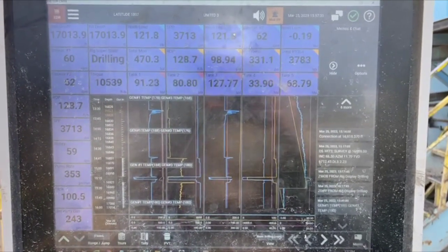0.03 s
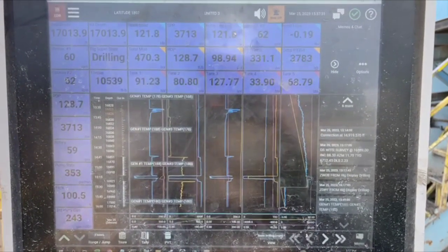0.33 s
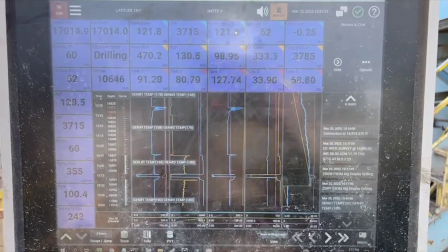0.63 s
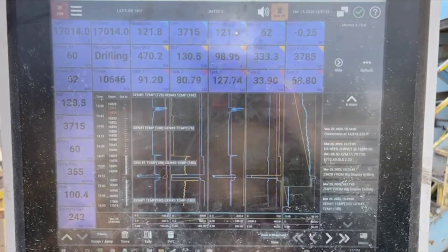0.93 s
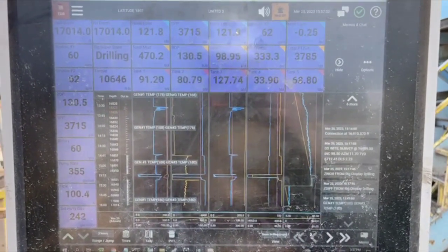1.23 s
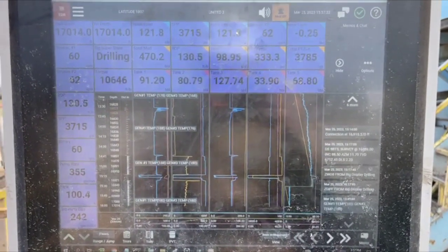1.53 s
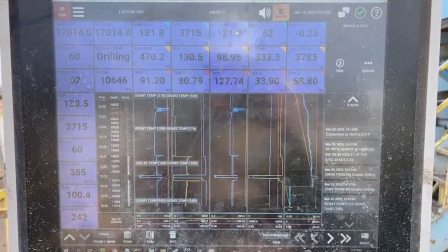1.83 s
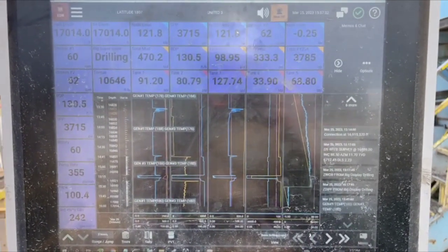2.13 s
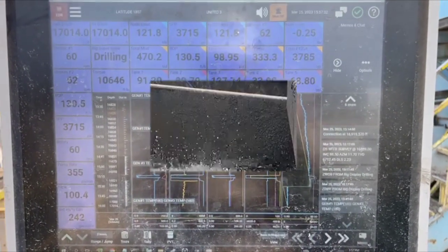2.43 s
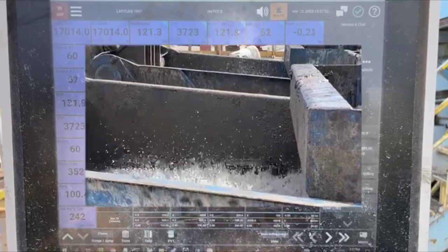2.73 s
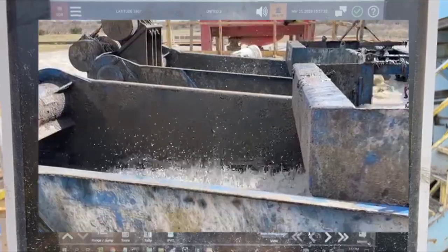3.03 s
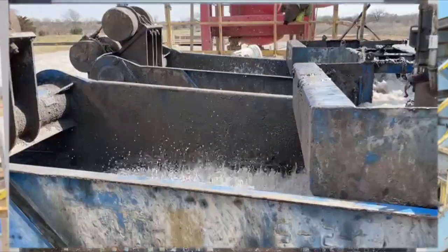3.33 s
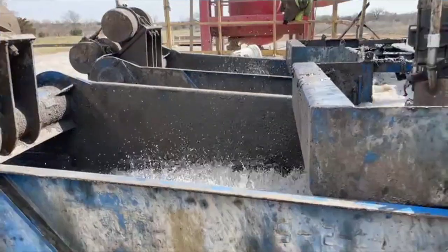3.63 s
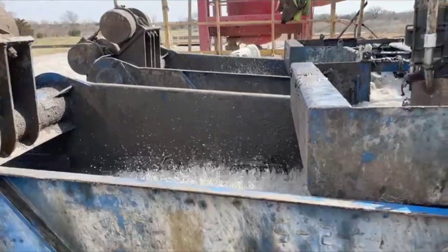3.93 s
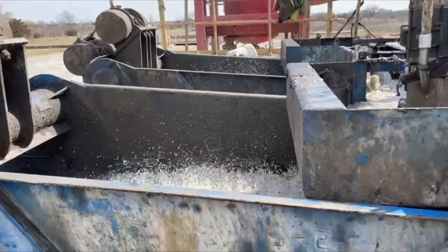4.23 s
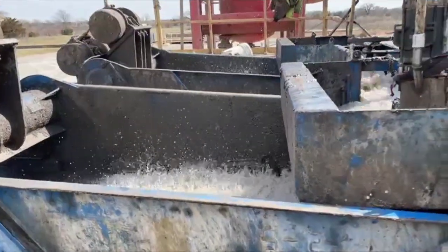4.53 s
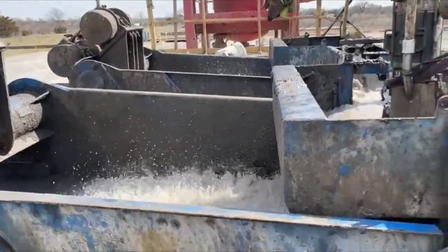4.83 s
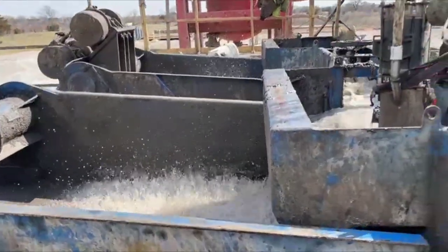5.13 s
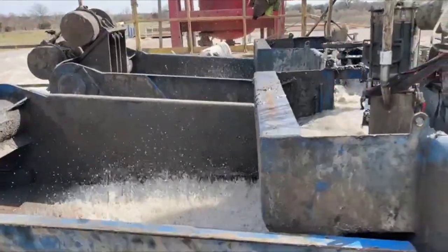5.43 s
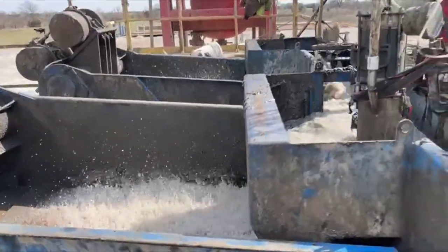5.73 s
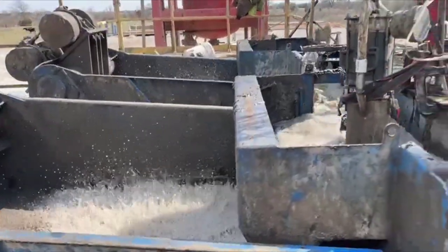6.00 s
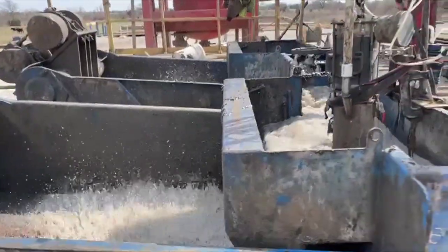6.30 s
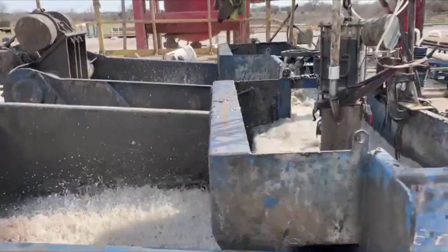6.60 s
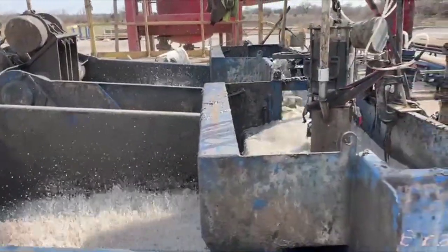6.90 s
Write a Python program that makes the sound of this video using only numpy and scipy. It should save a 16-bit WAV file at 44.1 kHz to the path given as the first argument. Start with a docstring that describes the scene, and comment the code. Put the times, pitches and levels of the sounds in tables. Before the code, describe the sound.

Outdoors on a drilling rig, a loud diesel engine drones over a pulsing low roar and gusts of faintly whistling air, with a few dull clunks. After about two seconds, close vibrating mud shakers cut in, chugging and rattling as mud hisses and spatters on their sieves. The engine and air overlap briefly, then stop. The shakers' throb grows, with a few quick slaps and a swelling steel ring.

```python
"""On a drilling rig, first at a control screen, then beside the shakers that sieve the drilling mud.
At the screen a diesel engine drones at about 1800 turns a minute over the roar of the plant and a rush
of air. The shakers turn a little slower: their baskets chug and knock, a steel wall sings, and mud
splashes and pops on the sieves. The two places overlap for a moment."""
import sys
import numpy as np
from scipy import signal
from scipy.fft import rfft, irfft
from scipy.io import wavfile

SR = 44100
rng = np.random.default_rng(int(sys.argv[2]) if len(sys.argv) > 2 else 0)


def wav_record(signal):
    """Record a signal, one row per channel, as 16-bit PCM in the file named by sys.argv[1]."""
    frames = np.transpose(np.atleast_2d(signal))
    bounded = np.clip(frames, -1, 1)
    # unit amplitude maps onto the largest positive 16-bit level
    quanta = np.round(bounded * 32767).astype(np.int16)
    wavfile.write(sys.argv[1], SR, quanta)


N = 315756
TIME = np.arange(N) / SR
SHAKERS_IN_S, SCREEN_OUT_S = 2.268, 3.712
DIESEL_TURNS_PER_S, SHAKER_TURNS_PER_S = 30.18, 30.06

# In each turn a basket lands, bounces and is jerked up. Each row: moment as a share of the turn, push.
KNOCKS = [(.09, .6), (.24, .6), (.7, -.38)]


def diesel(turns):
    """The engine's repeating blows make a stack of tones; two of them swell and fade."""
    # The engine's tones. Each row: multiple of the shaft speed, relative level in dB.
    tones = [(0.5, -50), (1, -20), (1.5, -27), (2, -15.5), (2.5, -35), (3, -20), (3.5, -28.5), (4, -9),
             (4.5, -25), (5, -18), (5.5, -10), (6, -16), (6.5, -8), (7, -15.5), (7.5, -27), (8, -13),
             (8.5, -19), (9, -25), (9.5, -11.5), (10, -19.5), (10.5, -33.5), (11, -17), (11.5, -24.5),
             (12, -13), (12.5, -29), (13, -18.5), (13.5, -17.5), (14, -16.5), (14.5, -18.5), (15, -41),
             (15.5, -20), (16, -35), (16.5, -20.5), (17, -14.5), (17.5, -15.5), (18, -27), (18.5, -22),
             (19, -18), (19.5, -22), (20, -23), (20.5, -26), (21, -19), (21.5, -32), (22, -21)]
    # The lower and the upper swelling tone. Each row: time in seconds, boost in dB.
    lower = [(0, 0), (.7, -2.5), (1.35, 5.5), (1.8, -2.5), (3.7, 0.5)]
    upper = [(0, 2.5), (.9, 1), (1.5, -1), (3.7, 1)]
    swells = {5.5: curve(lower), 6.5: curve(upper)}
    return undb(-19) * drone(turns, tones, [(0.0015, 1)], smear_hz=151.9, waver=0.31, swells=swells)


def baskets(turns, throb_db):
    """The knocking shaker baskets hum, and one steel wall swells into song."""
    # The baskets' tones. Each row: multiple of the shaft speed, relative level in dB.
    tones = [(1, -16), (2, 1.5), (3, 1), (4, -14), (5, -11.5), (6, -10.5), (7, -21.5), (8, -20), (9, -14),
             (10, -20.5), (11, -25.5), (12, -23), (13, -15.5), (14, -14.5), (15, -19), (16, -23), (17, -15),
             (18, -37), (19, -21.5), (20, -13.5), (21, -21.5), (22, -22.5), (23, -33), (24, -23),
             (25, -25.5)]
    # The wall's song. Each row: start in seconds, length in seconds, peak boost in dB.
    wall_swells = [(3.45, 0.34, 1), (4.3, 0.4, 3), (4.6, 0.3, 4.5), (5.66, 0.42, 6.5), (6.24, 0.31, 6),
                   (6.62, 0.15, 3.5), (6.98, 0.049, 5)]
    # Standing waves (fixed loud and quiet spots): walking leads into some tones and out of others.
    walk = {2: throb_db, 3: -1.1 * np.maximum(throb_db + 2.3, 0), 6: -0.35 * throb_db,
            7: -2.2 * throb_db, 8: -1.9 * throb_db, 9: -1.4 * throb_db + 1.8 * sway(13),
            10: -0.9 * throb_db, 13: 0.5 * throb_db, 14: throb_db}
    wall_db = 20 * np.log10(surges(wall_swells, attack_s=0.14, release_s=0.22, rest_db=-3.5))
    # The wall lifts tone 20 and its neighbours with it.
    song = {20: wall_db + 1.3 * sway(12), 21: 0.55 * wall_db - 0.83 * throb_db,
            22: 0.26 * wall_db, 24: 1.2 * throb_db + 0.75 * wall_db}
    return undb(-17.5) * drone(turns, tones, KNOCKS, smear_hz=309, waver=0.21, swells={**walk, **song})


def far_shakers():
    """The shakers' deep throb carries to the control screen, arriving a little late."""
    # The throb's tones. Each row: multiple of the shaft speed, level in dB.
    tones = [(1, -39), (2, -26.5), (3, -17.5)]
    # The swell of its main tone. Each row: time in seconds, boost in dB.
    swell = [(0, 0.5), (.5, 1), (1.35, .6), (2.05, -0.5), (2.4, 0.8), (3.6, 0.6)]
    turns = SHAKER_TURNS_PER_S * (TIME - 0.012)
    return drone(turns, tones, KNOCKS, smear_hz=400, waver=0.3, swells={3: curve(swell)})


def plant_roar(turns):
    """The plant's low roar pulses with each turn of the diesel."""
    # The roar's colour. Each row: frequency in Hz, relative level in dB.
    shape = [(20, -20.5), (40, -6.5), (60, -0.5), (110, -3), (200, -3), (300, -8), (420, -5), (560, -8.5),
             (680, -5.5), (800, -13.5), (1000, -17), (1350, -27), (2000, -39.5)]
    cycles = turns / 2  # a four-stroke engine repeats every second turn
    noise = clatter(cycles, repeat_db=-7.5, low_hz=664, high_hz=1520)
    return undb(-24.5) * roar(noise, shape, 0.11 * np.cos(2 * np.pi * turns), flicker_db=1.0)


def deck_rattle(turns, throb_db):
    """The shaker deck rattles once a turn and again with the knocks, fading as the throb grows."""
    # The rattle's colour. Each row: frequency in Hz, relative level in dB.
    shape = [(15, -13), (30, 6), (60, -1.5), (110, 1), (200, -0.5), (330, -1), (480, -0.9), (640, -4.5),
             (800, -9), (1000, -13.5), (1300, -22.5), (2000, -42)]
    beat = 0.2 * np.cos(2 * np.pi * (turns - 0.8)) + 0.099 * np.cos(6 * np.pi * (turns - 0.18))
    noise = clatter(turns, repeat_db=-6.5, low_hz=796, high_hz=2000)
    return undb(-27 - 0.35 * throb_db) * roar(noise, shape, beat, flicker_db=1.2)


def rushing_air(turns):
    """Air surges past the control screen and whistles when it blows hard."""
    # The gusts. Each row: start in seconds, length in seconds, peak level in dB.
    gusts = [(.24, 1.22, -34), (2.58, 1.4, -34.5)]
    # The air's colour. Each row: frequency in Hz, relative level in dB.
    shape = [(760, -26), (1300, -9.5), (1450, -3), (1650, -1.5), (1820, -0.5), (2080, 0), (2380, -2.5),
             (2760, -12), (3480, -5), (3970, -7), (4680, -8), (6970, -13), (8560, -8.5), (9070, -13),
             (9380, -25.5), (12200, -56.5), (20600, -120)]
    # The whistles at full blow. Each row: pitch in Hz, width in Hz, level in dB.
    whistles = [(1565, 14, -49.5), (1683, 11, -48.5), (2020, 14, -43.5), (2068, 35, -47.5),
                (3160, 13, -52.5), (3400, 27, -51), (3560, 18, -53)]
    rush = surges(gusts, attack_s=0.21, release_s=0.71, rest_db=-38)
    noise = clatter(turns / 2, repeat_db=-12.5, low_hz=1180, high_hz=4000)
    draught = steel_echoes(noise, echo_db=-25, reach_s=0.06)
    air = rush * roar(draught, shape, 0.02 * np.cos(2 * np.pi * turns), flicker_db=1.0)
    return air + (rush / rush.max()) ** 2.4 * whines(whistles)


def mud_spray(turns, drops_per_s=26000):
    """Countless drops burst on the sieves, loudest when the basket throws them up."""
    # The spray's colour. Each row: frequency in Hz, relative level in dB.
    shape = [(760, -20), (1300, -6.5), (1530, -2), (1670, -3), (1820, -1), (1980, -3.5), (2760, -5.5),
             (3650, -7.5), (4880, -8.5), (6790, -9.5), (8420, -3), (8850, -4), (9380, -11.5), (12200, -45),
             (20600, -120)]
    sizes = rng.standard_normal(N) * undb(rng.standard_normal(N))
    drops = (rng.random(N) < drops_per_s / SR) * sizes
    throw = 0.055 * np.cos(2 * np.pi * (turns - 0.8))
    return undb(-37) * roar(drops, shape, throw, flicker_db=0.5)


def mud_slops():
    """Heavy slops of mud land on the sieves in uneven splashes."""
    # The landings. Each row: start in seconds, length in seconds, peak level in dB.
    slops = [(3.1, 0.55, -39), (4.15, 0.33, -45), (4.86, 0.1, -47), (5.1, 0.057, -38.5), (5.31, .05, -45),
             (6.47, 0.055, -53)]
    splash = colour(rng.standard_normal(N), [(1330, 0), (2400, -2)]) * undb(4.7 * sway(60))
    return surges(slops, attack_s=0.038, release_s=0.07, rest_db=-49.5) * unit(splash)


def mud_plops(count=420, low_hz=1305, high_hz=3250):
    """Blobs of mud pop at random, each with its own pitch and loudness."""
    when, softness, pitch = rng.random((count, 3)).T
    hz = low_hz * (high_hz / low_hz) ** pitch
    peak_db = -28.5 - 10.5 * np.sqrt(softness)
    return rings(zip(when * TIME[-1], peak_db, hz), fade_s=0.016)


def sieve_slaps():
    """A loose sieve slaps against its basket."""
    # Each row: start in seconds, peak level in dB, pitch in Hz.
    slaps = [(3.742, -23, 595), (4.739, -15, 610), (4.773, -16, 600), (4.783, -16, 640), (4.806, -16, 600),
             (4.839, -18, 606), (4.881, -16, 620), (5.038, -22, 560), (6.503, -18, 597), (6.634, -21, 600)]
    return rings(slaps, fade_s=0.02)


def plant_clunks():
    """Dull clunks ring briefly in the plant."""
    # Each row: start in seconds, peak level in dB, pitch in Hz.
    clunks = [(.768, -14.5, 517), (.909, -17, 680), (2.408, -22, 614), (3.341, -12, 620), (3.646, -11, 627)]
    return rings(clunks, fade_s=0.032)


def swelling_tones():
    """The far shakers' higher tones swell and fade over a faint high ring."""
    # Each row: pitch in Hz, start in seconds, length in seconds, peak level in dB.
    swells = [(1150, -0.5, 0.074, -42), (630, 1.7, 0.38, -33), (511, 3.5, 0.59, -37.5), (632, 3, .65, -31)]
    out = 0
    for hz, *swell in swells:
        out += surges([swell], attack_s=0.051, release_s=0.23, rest_db=-59) * tone(hz, waver=0.21)
    return out


def screen_motors():
    """At the screen, the far shakers and other machines whine, and a low hum beats against the drone."""
    # The whines. Each row: pitch in Hz, width in Hz, level in dB.
    tones = [(291.5, 1.97, -45), (510.5, 6, -38), (627, 3.2, -39.5), (980, 20, -48.5), (1165, 23, -47.5),
             (1195, 11, -48)]
    return whines(tones) + undb(-36) * tone(hz=66, waver=0.08)


def shaker_motors():
    """At the shakers, pumps and motors whine over a low hum."""
    # The whines. Each row: pitch in Hz, width in Hz, level in dB.
    tones = [(900, 6, -50.5), (984, 25, -46.5), (1166, 25, -53.5), (1210, 8.8, -53), (1435, 7, -56),
             (1561, 15, -55.5), (2335, 17, -54)]
    return whines(tones) + undb(-40) * tone(hz=76.5, waver=0.08)


def drone(turns, tones, blows, smear_hz, waver, swells):
    """Tones of blows that repeat with a shaft; paths through the steel blur and shake the higher ones."""
    out = 0
    for multiple, db in tones:
        hz = multiple * turns[-1] / TIME[-1]
        # The blows set where each wave starts, not how loud it is.
        phase = np.angle(sum(push * np.exp(-2j * np.pi * multiple * share) for share, push in blows))
        phase += (hz / smear_hz) ** 2 * rng.standard_normal()
        paths = 1 + waver * min(hz / 400, 1) ** 2 * (sway(7) + 1j * sway(7))
        gain = undb(db + swells.get(multiple, 0))
        out += gain * np.real(paths * np.exp(1j * (2 * np.pi * multiple * turns + phase)))
    return out


def clatter(cycles, repeat_db, low_hz, high_hz):
    """The hiss of churning air, plus a clatter that repeats every cycle."""
    pattern = rng.standard_normal(SR // 15)
    looped = np.interp(cycles % 1, np.linspace(0, 1, len(pattern)), pattern)
    band = signal.butter(3, [low_hz, high_hz], "band", fs=SR, output="sos")
    return rng.standard_normal(N) + undb(repeat_db) * signal.sosfilt(band, looped)


def roar(noise, shape, beat, flicker_db):
    """Coloured noise that pulses with the machine's beat while each octave flickers on its own."""
    spectrum = rfft(colour(noise, shape))
    octave = np.log2(np.maximum(np.arange(N // 2 + 1) * SR / N, 1))
    bands = (irfft(spectrum * np.maximum(1 - np.abs(octave - k), 0), N) for k in range(3, 15))
    return unit(sum(band * undb(flicker_db * sway(14)) for band in bands) * (1 + beat))


def steel_echoes(sound, echo_db, reach_s, count=60):
    """Short echoes off nearby steel strengthen some pitches and weaken others."""
    out = sound
    for distance, sign in zip(0.2 + rng.random(count), rng.choice([-1, 1], count)):
        echo = np.roll(sound, int(distance * reach_s * SR))
        out = out + sign * undb(echo_db) * np.exp(-distance) * echo
    return out


def whines(tones):
    """Unsteady tones: the wider each is, the faster it flutters."""
    return sum(undb(db) * np.real((sway(width) + 1j * sway(width)) * np.exp(2j * np.pi * hz * TIME))
               for hz, width, db in tones)


def tone(hz, waver):
    """A clean tone that wavers slightly."""
    return np.real((1 + waver * (sway(14) + 1j * sway(9))) * np.exp(2j * np.pi * hz * TIME))


def rings(rows, fade_s):
    """Short struck notes that die away by 60 dB in fade_s."""
    out, age = np.zeros(N + SR), np.arange(SR // 20) / SR
    for start, db, hz in rows:
        first = int(np.clip(start * SR, 0, N))
        out[first:first + len(age)] += undb(db - 60 * age / fade_s) * np.sin(2 * np.pi * hz * age)
    return out[:N]


def surges(rows, attack_s, release_s, rest_db):
    """A gain that rises from rest at each start and falls back once the length has passed."""
    rest = undb(rest_db)
    gain = np.full(N, rest)
    for start, length, db in rows:
        rise = (TIME - start) / attack_s
        fall = 1 - (TIME - start - length) / release_s
        shape = np.clip(np.minimum(rise, fall), 0, 1)
        gain = np.maximum(gain, rest + (undb(db) - rest) * shape)
    return gain


def colour(sound, shape):
    """Filter a sound to follow (Hz, dB) points, cut steeply past the ends, and scale to strength 1."""
    hz, db = np.transpose(shape)
    log_hz = np.log(np.maximum(np.arange(N // 2 + 1) * SR / N, 1))
    outside = np.abs(log_hz - np.clip(log_hz, np.log(hz[0]), np.log(hz[-1])))
    gain = undb(np.interp(log_hz, np.log(hz), db) - 60 * outside)
    return unit(irfft(rfft(sound) * gain, N))


def sway(per_s):
    """Random values, per_s each second, joined by straight lines."""
    return np.interp(TIME * per_s, np.arange(2048), rng.standard_normal(2048))


def curve(rows):
    """Join (seconds, value) points with straight lines."""
    return np.interp(TIME, *np.transpose(rows))


def undb(db):
    """Turn decibels into a gain."""
    return 10 ** (np.asarray(db) / 20)


def unit(sound):
    """Scale to an average strength (rms) of 1."""
    return sound / np.sqrt(np.mean(sound ** 2))


def scene():
    """The shakers come in abruptly; a little later the sound at the control screen stops."""
    turns = DIESEL_TURNS_PER_S * TIME
    screen = diesel(turns) + far_shakers() + plant_roar(turns) + rushing_air(turns)
    screen += swelling_tones() + screen_motors() + plant_clunks()
    turns = SHAKER_TURNS_PER_S * TIME
    throb_db = -4.5 + (TIME - SHAKERS_IN_S)  # walking along the shakers, the throb grows 1 dB a second
    shakers = baskets(turns, throb_db) + deck_rattle(turns, throb_db)
    shakers += mud_spray(turns) + mud_slops() + mud_plops() + shaker_motors() + sieve_slaps()
    return (screen * (TIME < SCREEN_OUT_S) + shakers * (TIME >= SHAKERS_IN_S))[None]


def record(dry):
    """Cut the highest treble off steeply."""
    top_hz = 9450
    return signal.sosfilt(signal.ellip(10, 0.2, 80, top_hz, fs=SR, output="sos"), dry)


dry = scene()
out = record(dry)
wav_record(out)
```